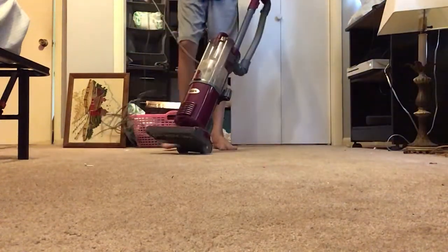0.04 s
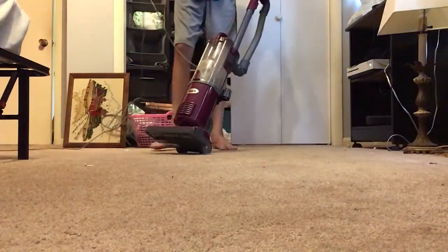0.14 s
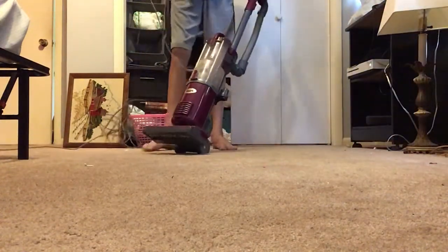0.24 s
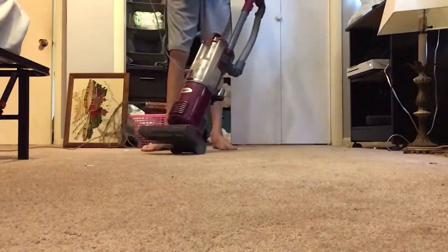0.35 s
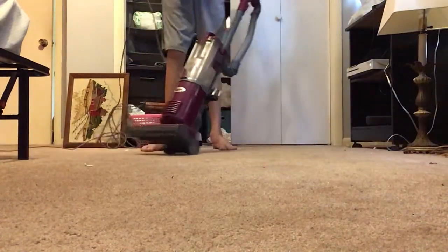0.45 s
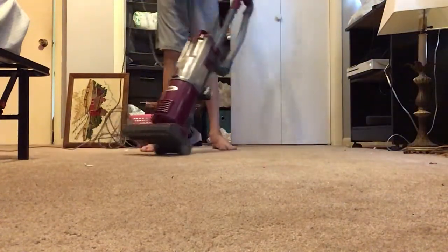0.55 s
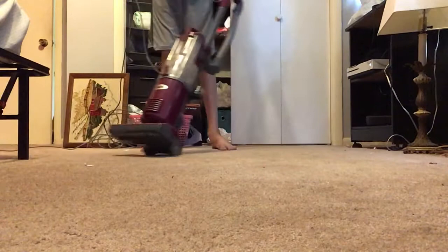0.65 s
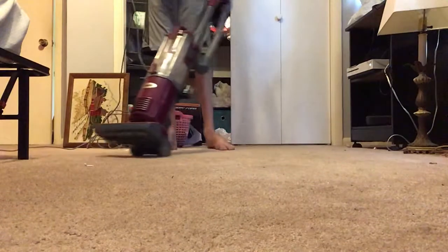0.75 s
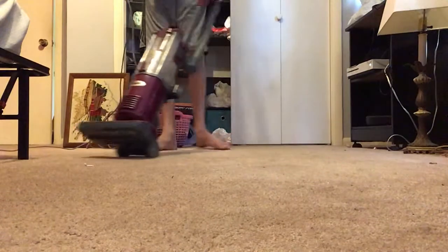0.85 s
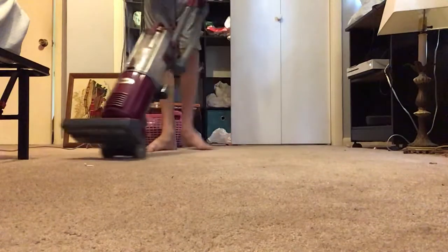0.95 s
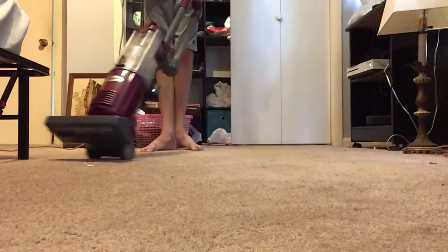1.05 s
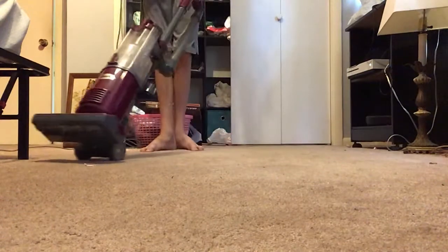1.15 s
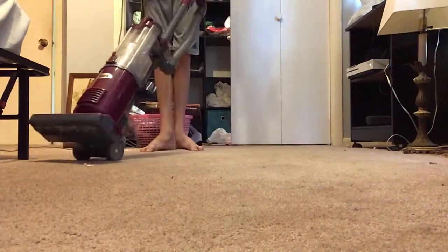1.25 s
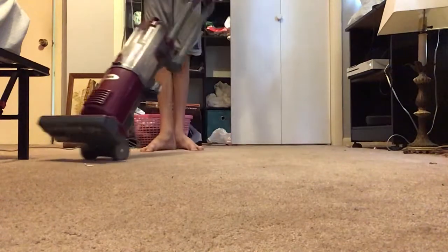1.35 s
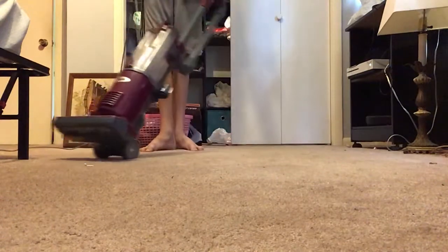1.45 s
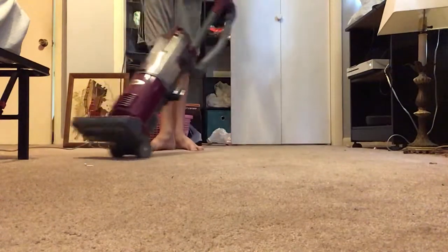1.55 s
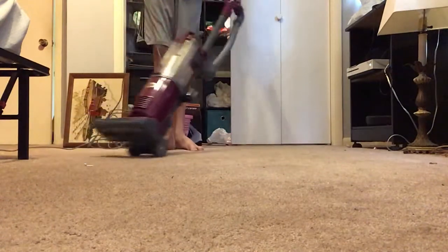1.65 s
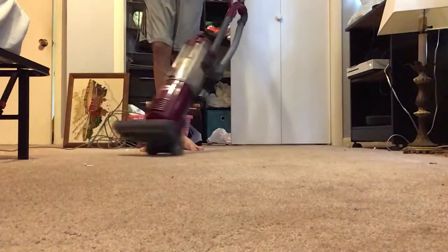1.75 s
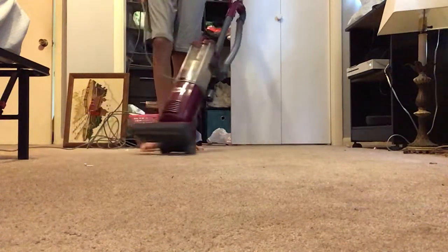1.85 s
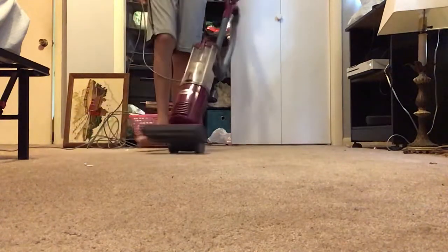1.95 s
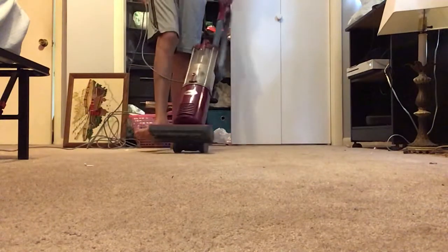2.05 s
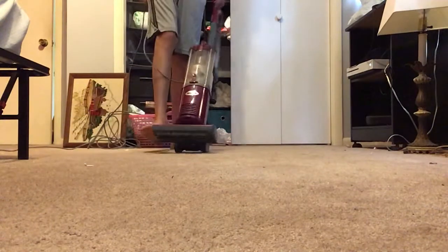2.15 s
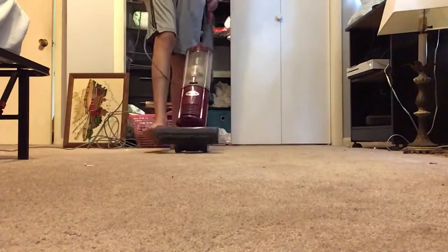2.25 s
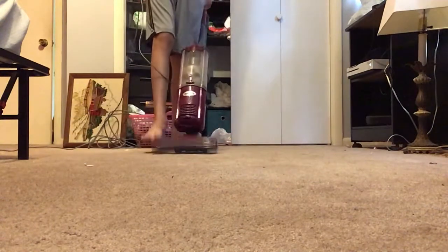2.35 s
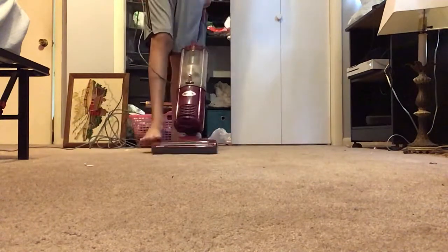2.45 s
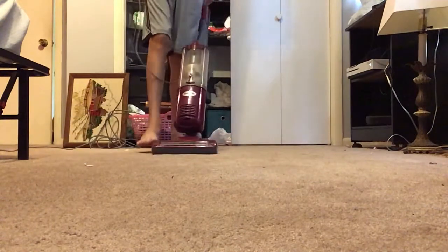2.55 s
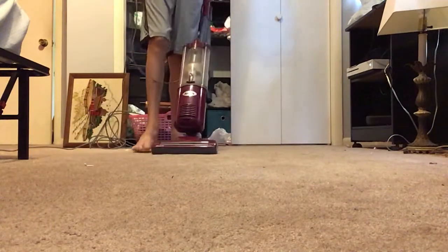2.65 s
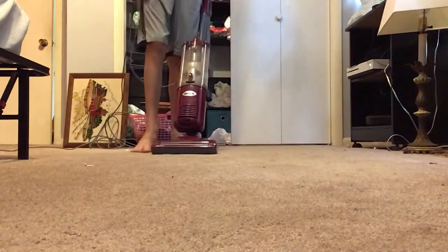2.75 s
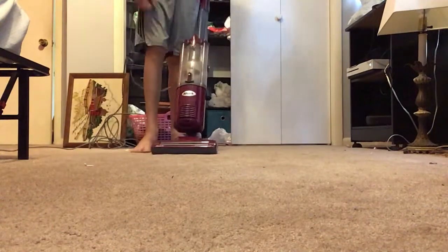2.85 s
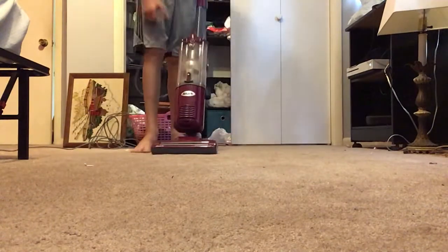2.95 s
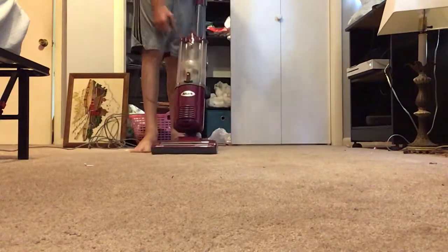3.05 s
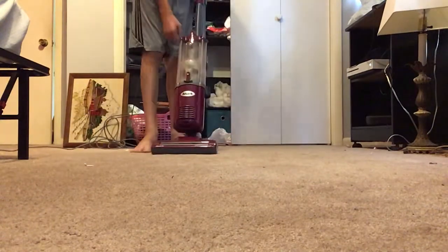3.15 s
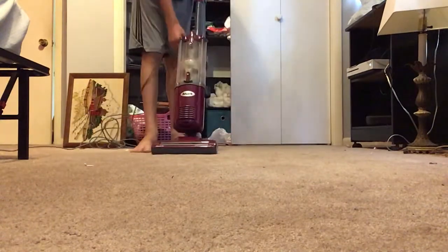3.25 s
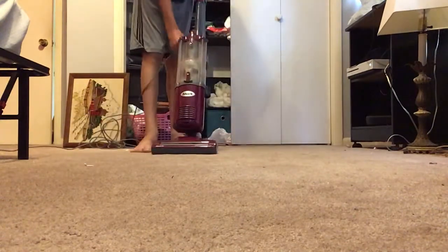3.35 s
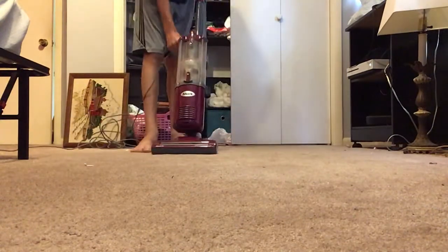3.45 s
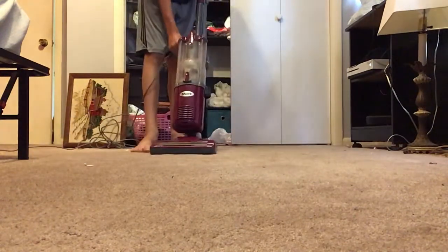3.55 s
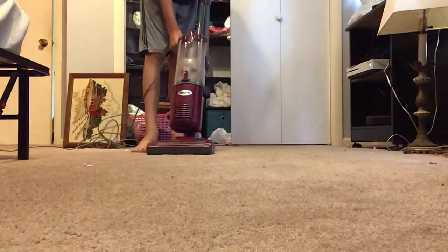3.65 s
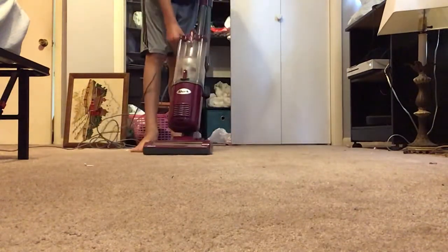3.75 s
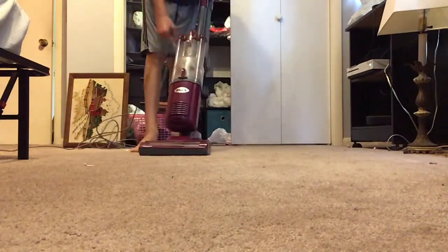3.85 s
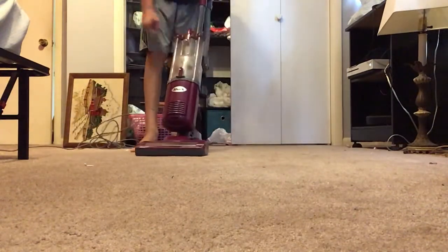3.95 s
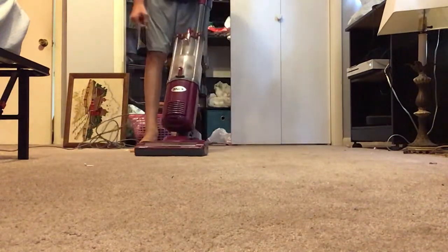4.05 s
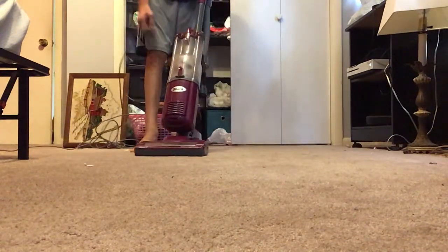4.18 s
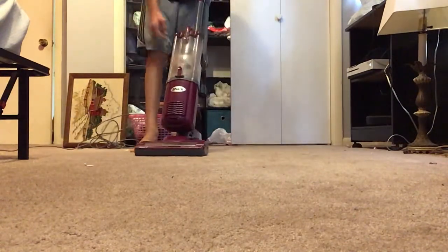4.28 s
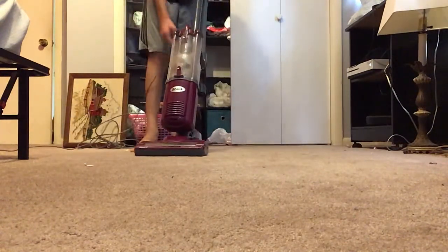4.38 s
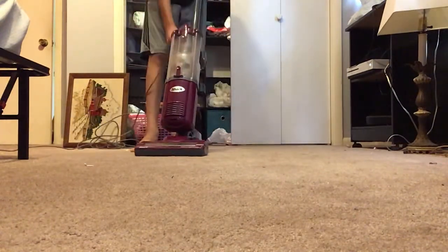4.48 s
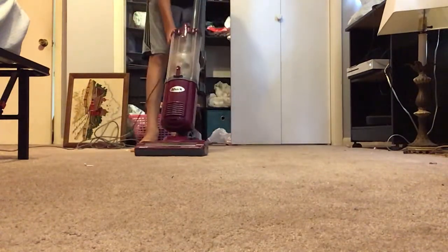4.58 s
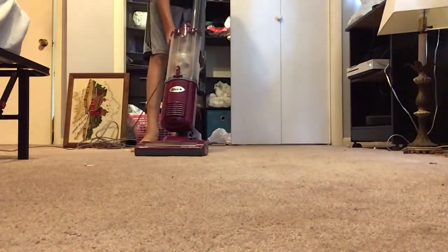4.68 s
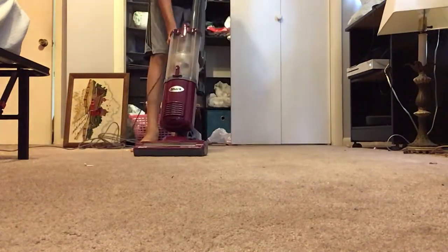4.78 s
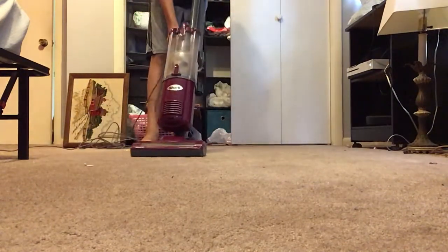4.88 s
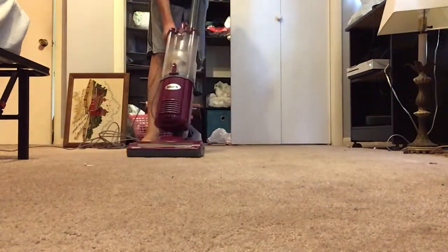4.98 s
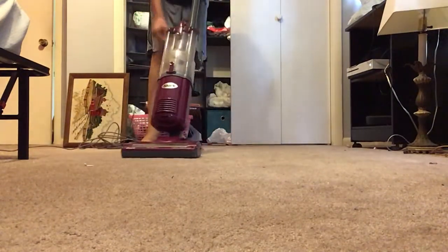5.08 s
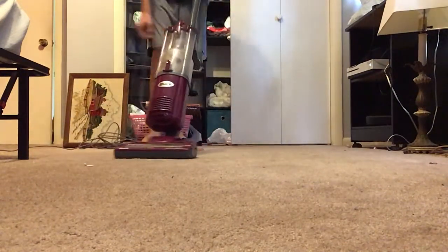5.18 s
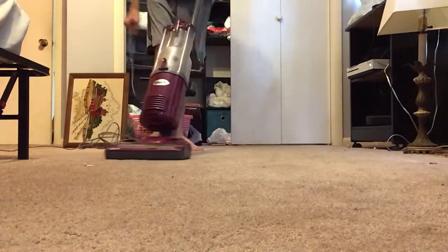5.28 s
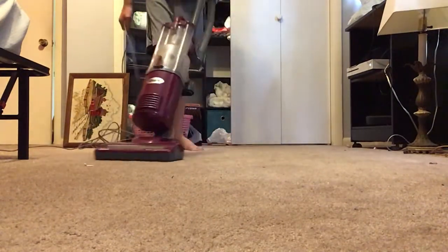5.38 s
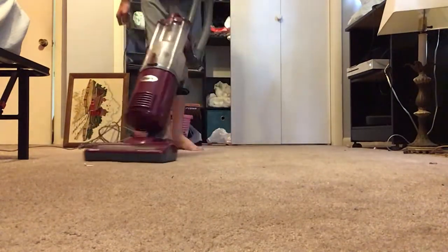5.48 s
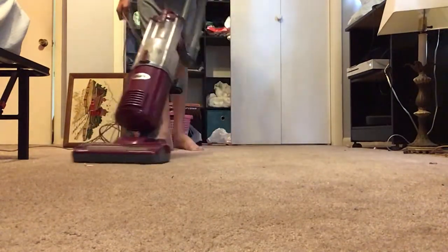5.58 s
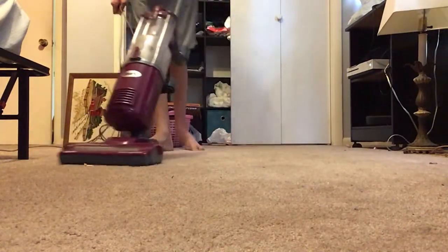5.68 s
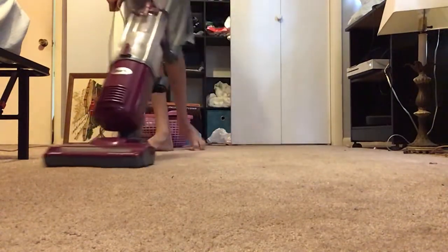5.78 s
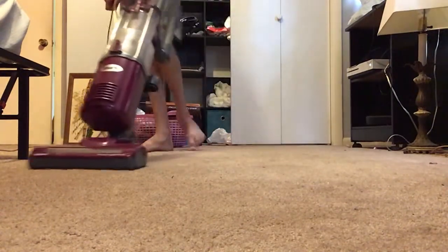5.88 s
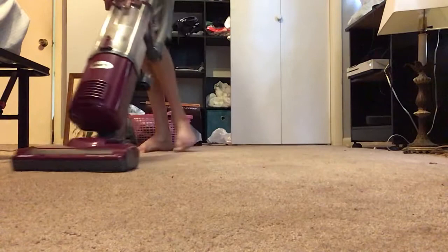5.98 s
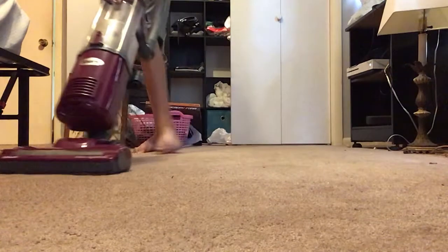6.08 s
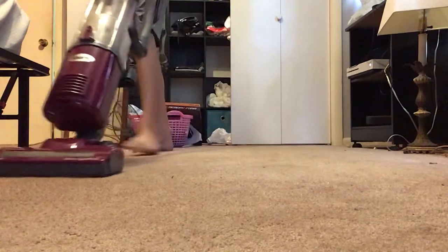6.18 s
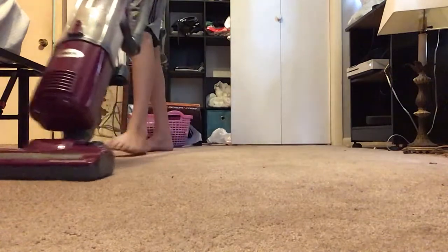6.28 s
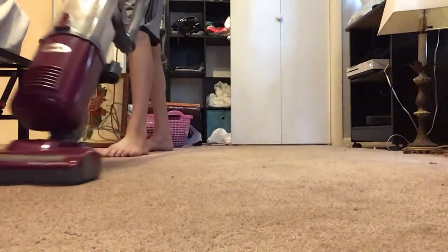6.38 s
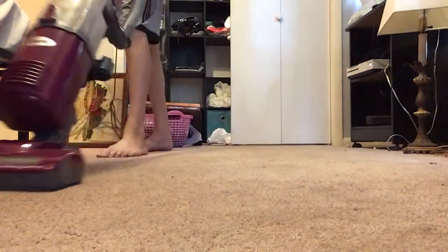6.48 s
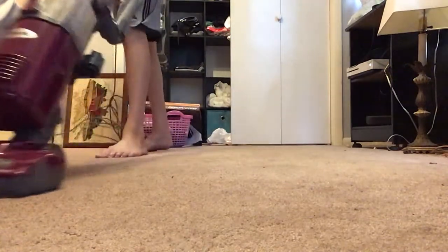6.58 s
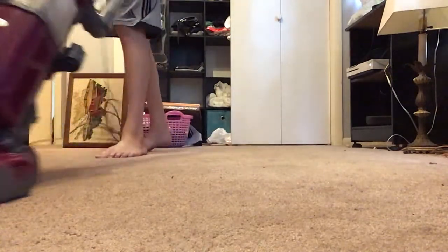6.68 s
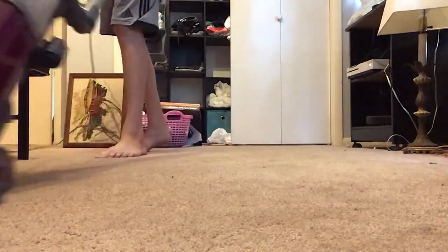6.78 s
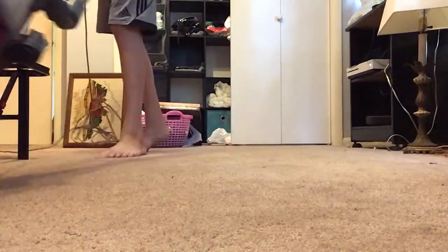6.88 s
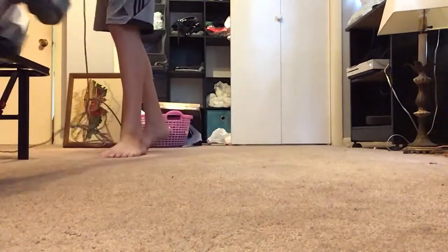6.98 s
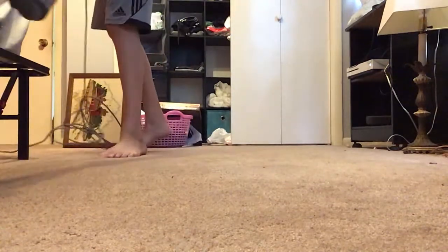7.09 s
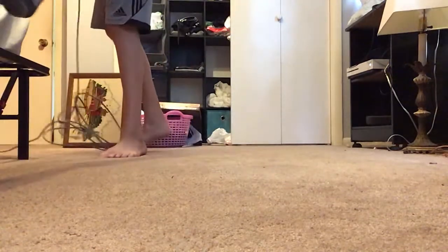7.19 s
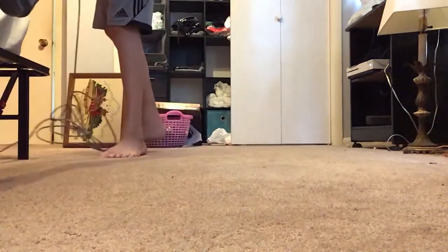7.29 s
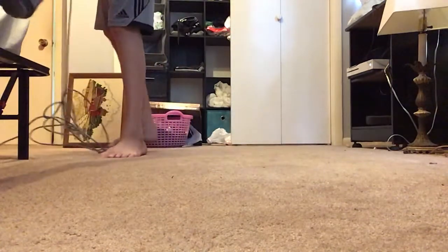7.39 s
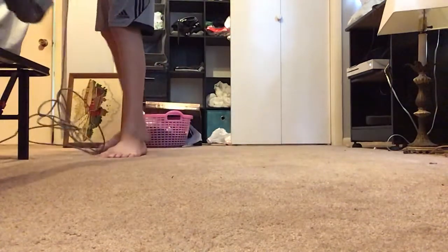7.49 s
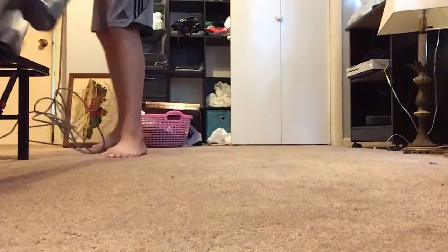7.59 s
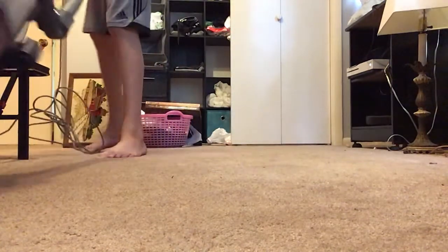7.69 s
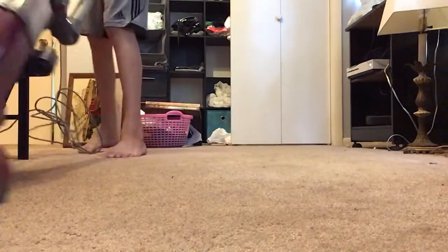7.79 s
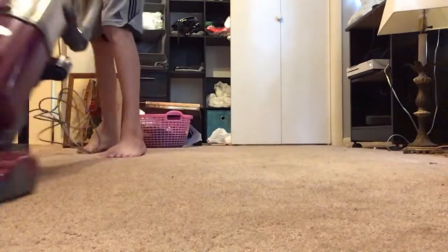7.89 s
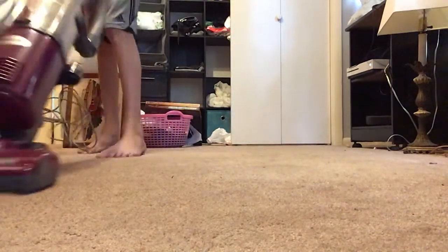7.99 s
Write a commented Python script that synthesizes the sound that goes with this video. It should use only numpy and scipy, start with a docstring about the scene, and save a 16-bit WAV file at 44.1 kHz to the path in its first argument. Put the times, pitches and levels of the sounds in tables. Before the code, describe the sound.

In a small carpeted bedroom, a switched-off upright vacuum rolls with dull rumbles, scuffs and plastic clicks. Its handle latches with a sharp clack and the head thumps down, a spring buzzing faintly. The motor bursts on briefly and its fan coasts down in pitch, then it restarts, roaring and whining as it moves closer to a single low microphone, grit ticking inside, and eases slightly at the end.

```python
"""An upright vacuum cleaner on carpet in a small bedroom. Switched off, it rolls about with dull rumbles and clicks;
its handle latches upright and the head thumps down on the boards while the latch spring buzzes.
It is switched on briefly: the brush stops at once and the fan coasts down. Then it starts again and is pushed
nearer, and it eases off a little at the end. The suction fan is gliding tones over coloured air noise; the slower
brush motor is an uneven beat and a whine, and grit ticks are short decaying sines."""
import sys
import numpy as np
from scipy import signal
from scipy.fft import rfft, irfft
from scipy.io import wavfile
from scipy.ndimage import uniform_filter1d, map_coordinates

SR = 44100
rng = np.random.default_rng(int(sys.argv[2]) if len(sys.argv) > 2 else 0)


def to_wav(sig):
    """Store sig (one row per channel, or 1-D mono) as 16-bit WAV at the path in sys.argv[1].

    Samples outside -1..1 are clipped; the rate is SR.
    """
    pcm = np.clip(np.atleast_2d(sig), -1, 1) * 32767
    pcm = np.round(pcm).astype(np.int16)
    wavfile.write(sys.argv[1], SR, pcm.T)  # frames by channels


def rack_gain(trim_db):
    """Turn a fader trim in dB into the linear factor to multiply a signal by."""
    fader = np.asarray(trim_db, float)
    return 10 ** (fader / 20)


N = 354123

# Quiet of the room, colour of its noise: pitch_hz, relative density_db (per Hz)
QUIET_COLOUR = [(18, -39), (30, -2.5), (103, -2.5), (204, -5), (913, -17.5), (1160, -22.5), (3220, -23),
                (9710, -29), (13300, -32), (16000, -51)]
QUIET_DB = -59
# Bedroom tail: pitch_hz, t60_s
ROOM_DECAY = [(150, 0.21), (1000, 0.12), (5000, 0.39), (14000, 0.24)]

# Shoves and steps on the carpet, switched off: start_s, rumble_db, scuff_db, rumble_fade_db_per_s
SHOVES = [(0.0, -51, -44, 60), (0.09, -36.5, -33, 164), (0.2, -52, -50, 27), (0.6, -57, -65, 64),
          (0.85, -53, -53, 88), (0.99, -54, -57.5, 110), (1.1, -67, -55, 64), (1.39, -54.5, -63, 100),
          (1.59, -52, -54.5, 100), (1.74, -58, -52, 51), (2.18, -52, -53, 130), (2.36, -30.5, -36, 125),
          (2.6, -50.5, -75, 20), (2.86, -57, -54.5, 112), (3.15, -60, -62, 9), (3.38, -67, -58, 147),
          (4.58, -53, -50, 150)]
SHOVE_RISE_S = 0.032
# Colours of the rolling rumble and of the scuff: pitch_hz, relative density_db (per Hz)
ROLL_COLOUR = [(18, -57), (30, -36), (43, -7), (98, 11), (194, -0.5), (400, -22.5), (520, -37), (880, -120)]
SCUFF_COLOUR = [(120, -29), (200, 3), (370, -1.5), (520, -5.5), (700, -13), (1000, -24), (1800, -20.5),
                (4000, -42)]

# Plastic clicks and rattles of the casing: start_s, level_db, relative low_knock_db, relative bright_edge_db,
# rattle_length_s
CLICKS = [(0.014, -48.5, 12, -24, 0.04), (0.079, -26, 3, -10.5, 0.04), (0.12, -49.5, 5, -7, 0.066),
          (0.233, -46.5, -5, -7, 0.063), (0.297, -48.5, 6.5, -21, 0.036), (0.424, -58.5, 5, -13, 0.054),
          (0.588, -43.5, -11, -11.5, 0.038), (1.424, -55, 6, -1, 0.01), (1.666, -52, -7, 0, 0.014),
          (1.709, -53, 9.5, -16, 0.023), (1.8, -62, -4, -1, .02), (2.159, -52, 2, -3, 0.026),
          (2.225, -55, 2, -7, 0.022), (2.278, -52, 8, -8, 0.034), (2.295, -17.5, -2, -4.5, 0.024),
          (2.331, -35.5, -6, -8, 0.065), (2.42, -50.5, -19, -24, 0.074), (2.863, -61.5, 14, -17, 0.015),
          (3.238, -55, -5, -1, 0.032), (3.273, -44, -5.5, -8.5, 0.043), (3.47, -41.5, 1, -18, 0.04),
          (4.46, -61, -10, 5, .01), (4.696, -43, -2, 6, 0.016)]
# The head lands and bounces: start_s, level_db
THUMPS = [(2.351, -27), (2.367, -16.5), (2.397, -19.5), (2.436, -38), (2.467, -34)]
# Floor board modes: pitch_hz, level_db (relative to the thump), t60_s
BOARD_MODES = [(71.5, -12.5, 0.73), (88.7, -1, 0.3), (104.5, 10, 0.096), (144.5, -13, 0.4),
               (208, -14, 0.16), (345, -16, 0.081), (470, -24, .05)]
# Latch spring modes: pitch_hz, level_db, t60_s
SPRING_MODES = [(1710, -55, 0.85), (2770, -44, 0.29), (5300, -44, 0.34), (5480, -52, 0.27)]

# Loudest grains flung into the duct: start_s, peak_db, pitch_hz
BIG_GRAINS = [(6.0942, -31, 8940), (6.3523, -32, 10710), (6.685, -30, 10250), (6.7888, -33, 9370),
              (6.923, -30.5, 9250), (7.2332, -26.5, 10950), (7.2938, -24, 10260), (7.375, -28, 11500),
              (7.5712, -26, 12400)]
FINE_GRIT_DB, FINE_GRIT_FROM_S = -43, 5.2  # softest small grain; earliest start

# Power switch: on_s, off_s
SWITCH = [(3.478, 3.656), (4.689, 9)]
# Nearness to the microphone, of which each layer takes its own share: time_s, gain_db
NEARNESS = [(3.4, 0), (4.6, 2.8), (5.3, 1.2), (5.9, 1.5), (6.4, 3.5), (6.65, 4), (6.85, 5), (7.1, 6.5),
            (7.4, 7), (7.65, 6), (7.9, 3.5), (8.03, 2.5)]

# Colours of the nozzle rumble, the duct roar and the hiss: pitch_hz, relative density_db (per Hz)
RUMBLE_COLOUR = [(18, -62), (30, -51), (96, -7.5), (159, -2), (214, -2.5), (269, -1), (327, 1), (493, -3.5),
                 (630, -5), (684, -9), (1500, -23.5), (1950, -24), (3300, -120)]
ROAR_COLOUR = [(410, -15), (700, -4.5), (950, -10), (1500, -9.5), (2100, -9), (3300, -15.5), (5300, -13.5),
               (7000, -18.5), (9500, -19.5), (12400, -22), (20000, -120)]
HISS_COLOUR = [(4120, -21), (7000, 3.5), (7630, -1.5), (12700, -4), (14900, -7), (16000, -28)]
# Duct resonances in the roar: pitch_hz, width_hz, lift_db
DUCT_PEAKS = [(1150, 140, 4), (1693, 51, 4.5), (2363, 48, 7), (2840, 520, 8), (3910, 620, 10),
              (4790, 170, 7.5), (5820, 540, 4), (7800, 250, 7.5)]
# Level of each air layer: fan_db (at full speed), power of fan speed, brush_db, share of the nearness gain
RUMBLE_LAW = (-37, 1.67, -35, 0.69)
ROAR_LAW = (-37, 2.5, -45.5, 1.01)
HISS_LAW = (-45, 2.5, -58, .55)

# Brush motor under load: time_s, whine_hz (at full drive), whine_db; the whine is eighteen times the beat rate
BRUSH_LOAD = [(3.4, 1915, -41.5), (3.75, 1899, -45.5), (4.7, 1891, -41.5), (4.95, 1886, -47.5),
              (5.2, 1834, -41.5), (5.42, 1884, -50), (5.87, 1920, -47.5), (6.05, 1936, -55),
              (6.26, 1945, -59), (6.29, 1935, -40), (6.4, 1915, -42), (6.46, 1968, -44),
              (6.53, 1931, -42.5), (6.63, 1930, -38.5), (6.69, 1967, -41.5), (6.9, 1957, -33.5),
              (6.98, 1989, -37.5), (7.07, 1946, -34.5), (7.16, 1985, -34.5), (7.5, 1980, -33),
              (7.6, 1968, -36.5), (7.78, 1946, -36), (7.88, 1960, -33.5), (7.95, 1965, -45),
              (8.03, 1963, -40)]
# Partials of the carpet beat: multiple of the beat rate, relative level_db
BEAT_PARTIALS = [(1, -5), (2, -1.5), (3, -2.5), (4, -6.5), (5, -11.5), (7, -16), (12, -17)]
BEAT_DB, HUNT_HZ = -38, 4.974  # beat level at full speed; random hunting of the whine
BRUSH_UP_S, BRUSH_BRAKE_HZ_PER_S = 0.058, 9600  # energy rise; the carpet brakes the unpowered brush steadily

FAN_HZ = 628  # full shaft speed
FAN_UP_S, FAN_COAST_S = 0.2, 1.0  # time constants: its energy rising, its speed dying
# Shaft tone by its pitch: pitch_hz, level_db
SHAFT_BODY = [(170, -63), (243, -45.5), (298, -53), (343, -47), (385, -59), (415, -42), (455, -49),
              (520, -34), (575, -32), (605, -42), (628, -38)]
BLADE_DB = -56  # blade tone at full speed, before the pipes lift it
# Pipe resonances that lift the blade tone: pitch_hz, width_hz, lift_db
BLADE_PIPES = [(1730, 280, 25), (2390, 200, 12), (2800, 330, 22), (3250, 250, 12), (4020, 340, 21)]
# Weaker fan tones: multiple of shaft speed, level_db (at full speed, before the port)
FAN_ORDERS = [(2.65, -57), (4.3, -45.5), (6, -55), (8, -68), (11, -70), (12, -66), (14, -68), (21, -69),
              (24, -68.5), (36, -73), (48, -73)]
# How the casing lets those tones out: pitch_hz, gain_db
FAN_PORT = [(600, -18), (800, 0.5), (1040, -2.5), (1200, -38), (3000, -4), (5000, 3), (8000, 9), (12000, 9),
            (15000, -2)]


def unit(x):
    """Scaled to rms 1."""
    return x / np.sqrt(np.mean(x ** 2) + 1e-20)


def along(points, hz):
    """Points of pitch_hz and value, read on a log pitch axis."""
    f, v = np.transpose(points)
    return np.interp(np.log(hz + 1), np.log(f + 1), v)


def curves(rows):
    """One value per sample for each column after the time."""
    s, *cols = np.transpose(rows)
    return [np.interp(np.arange(N) / SR, s, c) for c in cols]


def resonance_db(peaks, hz):
    """Summed lift of resonances given as pitch_hz, width_hz, lift_db."""
    return sum(db / (1 + (2 * (hz - centre) / width) ** 2) for centre, width, db in peaks)


def wobble(rate):
    """A smooth random curve, rate knots a second."""
    knots = rng.standard_normal(int(N * rate / SR) + 4)
    return map_coordinates(knots, [np.arange(N) * rate / SR])


def rush(colour, patchy_db, peaks=()):
    """Coloured noise of rms 1 with patches of random gain, lifted at any resonances."""
    z = signal.stft(rng.standard_normal(N), nperseg=512)[2]
    patches = uniform_filter1d(rng.standard_normal(z.shape), size=5, axis=0)
    patches = uniform_filter1d(patches, size=10, axis=1)
    noise = signal.istft(z * rack_gain(patchy_db * unit(patches)), nperseg=512)[1][:N]
    hz = np.fft.rfftfreq(N, 1 / SR)
    gain = rack_gain(along(colour, hz) + resonance_db(peaks, hz))
    return unit(irfft(rfft(noise) * gain, N))


def tone(turns, waver_db, drift, rate, blur=0):
    """A sine on a running phase, unsteady in level and phase; blur adds fast phase noise."""
    phase = 2 * np.pi * turns + drift * wobble(rate) + blur * wobble(220)
    return np.sqrt(2) * rack_gain(waver_db * wobble(rate)) * np.sin(phase)


def ring(modes, attack, rough):
    """Damped modes set off by one blow; roughness blurs their pitch."""
    t = np.arange(SR) / SR
    blur = rough * np.cumsum(rng.standard_normal((len(modes), SR)), axis=1)
    sound = np.zeros(SR)
    for (hz, db, t60), phase in zip(modes, blur):
        sound += rack_gain(db - 60 * t / t60) * np.sin(2 * np.pi * hz * t + phase)
    return (1 - np.exp(-t / attack)) * sound


def spin(full, up_s, coast):
    """Motor speed: its square climbs towards full while powered, then coast(speed, seconds) slows it."""
    t, speed = np.arange(N) / SR, np.ones(N)
    for on, off in SWITCH:
        start = np.interp(on, t, speed)
        energy = full ** 2 - (full ** 2 - start ** 2) * np.exp(-np.abs(t - on) / up_s)
        speed = np.where(t >= on, np.sqrt(np.abs(energy)), speed)
        at_off = np.interp(off, t, speed)
        speed = np.where(t >= off, coast(at_off, np.abs(t - off)), speed)
    return np.maximum(speed, 1)


def fan_speed():
    """Shaft turns a second; unpowered, the fan slows exponentially."""
    return spin(FAN_HZ, FAN_UP_S, lambda hz, s: hz * np.exp(-s / FAN_COAST_S))


def brush_speed():
    """Whine pitch of the brush motor in Hz; unpowered, it falls in a straight line."""
    return spin(curves(BRUSH_LOAD)[0], BRUSH_UP_S,
                lambda hz, s: np.maximum(hz - BRUSH_BRAKE_HZ_PER_S * s, 0))


def strain(speed, full):
    """0-1: how hard the shaft is being driven up, full = relative gain a second that counts as 1."""
    climb = np.gradient(np.log(speed)) * SR
    return np.clip(uniform_filter1d(climb, size=1500) / full, 0, 1)


def quiet():
    """The quiet of the room: soft, steady coloured noise."""
    return rack_gain(QUIET_DB) * rush(QUIET_COLOUR, patchy_db=-0.5)


def room(x):
    """The bedroom's tail, each frequency dying at its own speed, drawn afresh every quarter second."""
    out, step, delay = np.zeros(N + SR), SR // 4, SR // 300
    for start in range(0, N, step):
        hz, t, z = signal.stft(rng.standard_normal(SR // 2), SR, nperseg=256)
        fade = rack_gain(-60 * t / along(ROOM_DECAY, hz)[:, None])
        tail = signal.istft(z * fade, SR, nperseg=256)[1]
        piece = x[start:start + 2 * step]
        piece = piece * np.hanning(2 * step)[:len(piece)]  # overlapping pieces crossfade
        wet = signal.fftconvolve(piece, tail / np.linalg.norm(tail))
        out[start + delay:][:len(wet)] += wet[:len(out) - start - delay]
    return out[:N]


def rolling():
    """Wheels and feet on carpet: a lumpy low rumble and a scuff that swell and fade with each shove."""
    t, low, scuff = np.arange(N) / SR, 0, 0
    for s, low_db, scuff_db, fade_db in SHOVES:
        rise = np.exp(-((t - s) / SHOVE_RISE_S) ** 2)
        shape = np.where(t < s, rise, rack_gain(-fade_db * np.abs(t - s)))
        low = low + rack_gain(low_db) * shape
        scuff = scuff + rack_gain(scuff_db) * shape ** 1.38  # the scuff fades faster
    low = low * rack_gain(1.3 * wobble(24.7)) * rush(ROLL_COLOUR, patchy_db=-2.0)
    return low + scuff * rack_gain(2.0 * wobble(45)) * rush(SCUFF_COLOUR, patchy_db=1.0)


def clicks():
    """Each knock is a crack and a short uneven rattle of loose plastic, in three colour bands."""
    sound, t = np.zeros(N + SR), np.arange(SR // 4) / SR
    hz = np.fft.rfftfreq(len(t), 1 / SR)
    knock = [(150, -43), (330, 2), (550, 6), (950, -1.5), (1400, -36)]
    body = [(700, -22), (1200, 2.5), (2800, 3.5), (5000, -5.5), (7000, -23)]
    edge = [(3500, -50), (5500, -5.5), (10000, -12), (13000, -19), (16000, -40)]
    for s, db, low_db, edge_db, length in CLICKS:
        lumps = rack_gain(3.4 * unit(uniform_filter1d(rng.standard_normal(len(t)), size=130)))
        rattle = lumps * np.exp(-(t / max(length, 0.003)) ** 2)
        crack = 0.5 * rack_gain(-60 * t / 0.0067)
        shape = np.minimum(t / 0.001, 1) * (rattle + crack)
        for colour, rel_db in [(knock, low_db - 7.5), (body, -8), (edge, edge_db - 6.5)]:
            noise = unit(irfft(rfft(rng.standard_normal(len(t))) * rack_gain(along(colour, hz)), len(t)))
            sound[round(s * SR):][:len(t)] += rack_gain(db + rel_db) * shape * noise
    return sound[:N]


def landing():
    """The head bounces on the floor boards, exciting their modes, while the latch spring buzzes."""
    sound = np.zeros(N + SR)
    for s, db in THUMPS:
        sound[round(s * SR):][:SR] += rack_gain(db) * ring(BOARD_MODES, attack=0.004, rough=0)
    sound[round(2.4 * SR):][:SR] += ring(SPRING_MODES, attack=0.02, rough=0.12)
    return sound[:N]


def grit():
    """Grains tick against the duct wall as short rough-pitched sines: a few big ones over many small."""
    sound, t = np.zeros(N + SR), np.arange(SR // 40) / SR
    grains = list(BIG_GRAINS)
    for when, loud, bright in rng.random((40, 3)):
        s = FINE_GRIT_FROM_S + when * (N / SR - FINE_GRIT_FROM_S)
        grains.append((s, FINE_GRIT_DB + 9 * loud, 7000 + 5000 * bright))
    for s, db, hz in grains:
        tick = np.sin(2 * np.pi * hz * t + np.cumsum(rng.normal(0, 0.45, len(t))))
        sound[round(s * SR):][:len(t)] += rack_gain(db - 60 * t / 0.022) * tick
    return sound[:N]


def air():
    """Rumble of the nozzle on carpet, roar through the ducts and a flickering hiss, rising with motor speed."""
    flow, sweep = fan_speed() / FAN_HZ, brush_speed() / BRUSH_LOAD[-1][1]
    near_db, = curves(NEARNESS)

    def level(fan_db, power, brush_db, share):
        """Fan and brush shares add as powers, then nearness lifts them."""
        return rack_gain(share * near_db) * np.hypot(rack_gain(fan_db) * flow ** power, rack_gain(brush_db) * sweep)

    rumble_waver = rack_gain(1.3 * wobble(10) + 0.27 * wobble(30))
    rumble = level(*RUMBLE_LAW) * rumble_waver * rush(RUMBLE_COLOUR, patchy_db=1.0)
    roar_waver = rack_gain(0.19 * wobble(6.7))
    roar = level(*ROAR_LAW) * roar_waver * rush(ROAR_COLOUR, patchy_db=1.13, peaks=DUCT_PEAKS)
    hiss_flicker = rack_gain(1.0 * wobble(15) + 1.4 * wobble(45))
    hiss = level(*HISS_LAW) * hiss_flicker * rush(HISS_COLOUR, patchy_db=2.0)
    return rumble + roar + hiss


def brush():
    """Bristle rows beat the carpet unevenly; swells at the beat rate give the motor's whine side tones."""
    whine_hz, whine_db = brush_speed(), curves(BRUSH_LOAD)[1]
    near_db, = curves(NEARNESS)
    teeth = 18  # whine cycles per beat
    beats = np.cumsum(whine_hz + HUNT_HZ * wobble(20)) / SR / teeth
    share = whine_hz / BRUSH_LOAD[-1][1]

    slap = sum(rack_gain(db) * tone(k * beats, waver_db=2.6, drift=1.05, rate=14) for k, db in BEAT_PARTIALS)
    slap_level = rack_gain(BEAT_DB + 0.5 * near_db + 0.9 * wobble(9)) * share ** 2.2  # slower bristles strike softer

    swell = 1 + 0.3 * tone(beats, waver_db=0.5, drift=1.1, rate=10)
    swell += 0.16 * tone(2 * beats, waver_db=6, drift=1.4, rate=12)
    labour = np.clip((1915 - whine_hz) / 200, 0, 1)  # below free speed the motor runs rough
    whine = swell * tone(teeth * beats, waver_db=1.5, drift=0.3, rate=40, blur=0.3 + 1.8 * labour)
    whine_level = rack_gain(whine_db) * np.minimum(share / 0.43, 1) ** 2
    return slap_level * slap + whine_level * whine


def fan():
    """Shaft tone, seven-blade tone and weak orders glide with the shaft and blur as it is driven up."""
    speed = fan_speed()
    near_db, = curves(NEARNESS)
    turns, share = np.cumsum(speed) / SR, speed / FAN_HZ
    hard = strain(speed, full=5.7)

    shaft = tone(turns, waver_db=-0.1 + 2.4 * hard, drift=0.62 + 3 * hard, rate=24)
    sound = rack_gain(along(SHAFT_BODY, speed) - 8.6 * hard) * shaft

    blades = 7
    blade_level = share ** 1.8 * rack_gain(BLADE_DB + resonance_db(BLADE_PIPES, blades * speed) - 7 * hard)
    sound += blade_level * tone(blades * turns, waver_db=2, drift=0.8, rate=35, blur=0.4 + 1.3 * hard)

    for k, db in FAN_ORDERS:
        port = rack_gain(db + along(FAN_PORT, k * speed)) * (k * speed < SR / 2.5)  # silent near the band's top
        order = tone(k * turns, waver_db=4, drift=1.1, rate=22, blur=k * (0.06 + 0.14 * hard))
        sound += share ** 1.3 * port * order
    return sound * rack_gain(0.45 * near_db) * (speed > 1)


def scene():
    """Everything reaches one microphone, the same in both channels; motor tones, clicks and grit excite the room."""
    tones, knocks = fan() + brush(), clicks() + grit()
    answer = room(rack_gain(-8.5) * tones + rack_gain(-6.5) * knocks)
    mono = quiet() + answer + rolling() + knocks + landing() + air() + tones
    return np.array([mono, mono])


def band_limit(x):
    """A steep low-pass at the top of the band."""
    return signal.sosfilt(signal.butter(12, 16170, fs=SR, output="sos"), x)


def record(dry):
    """The microphone drops the deepest bass and the band ends sharply on top."""
    low_cut = signal.butter(4, 48, "high", fs=SR, output="sos")
    top_cut = np.fft.rfftfreq(N, 1 / SR) < 15800
    mix = irfft(rfft(signal.sosfilt(low_cut, dry)) * top_cut, N)
    return band_limit(mix)


dry = scene()
out = record(dry)
to_wav(out)
```